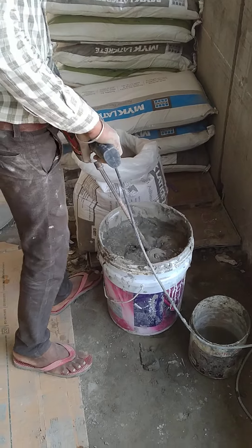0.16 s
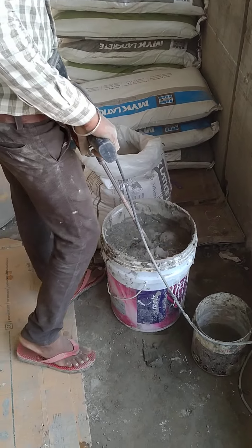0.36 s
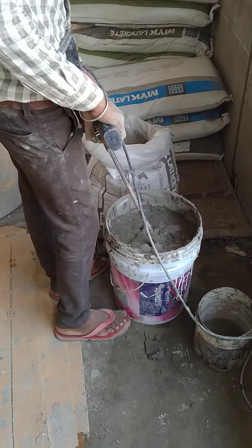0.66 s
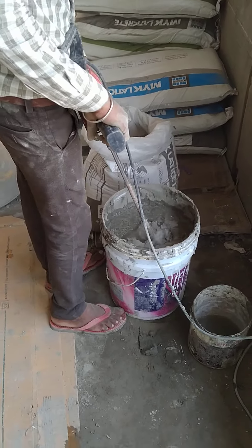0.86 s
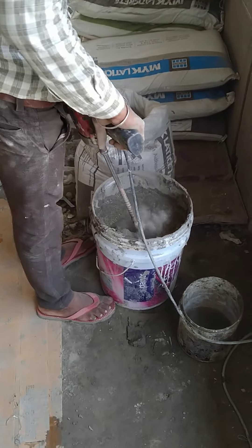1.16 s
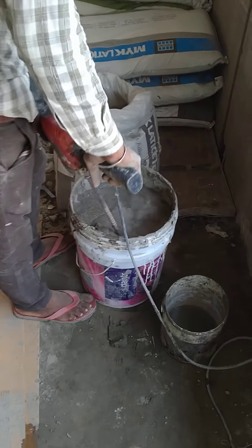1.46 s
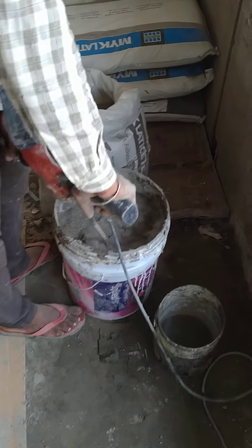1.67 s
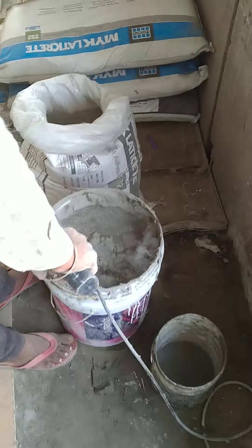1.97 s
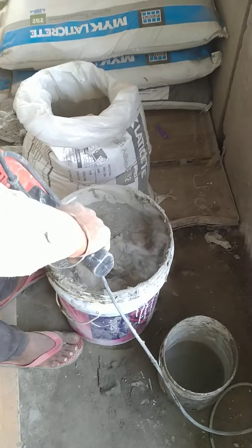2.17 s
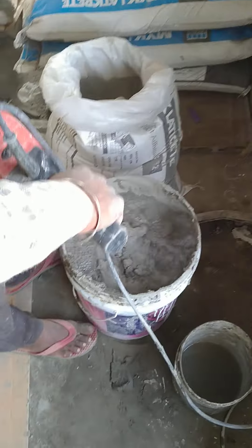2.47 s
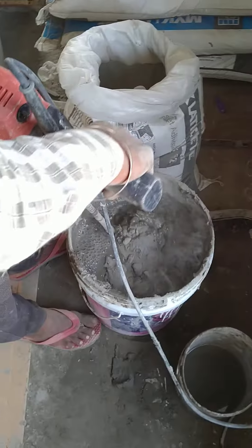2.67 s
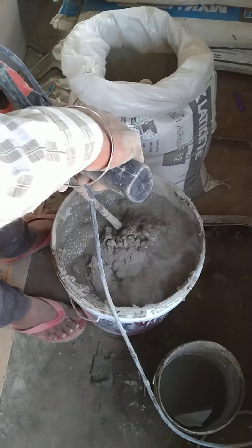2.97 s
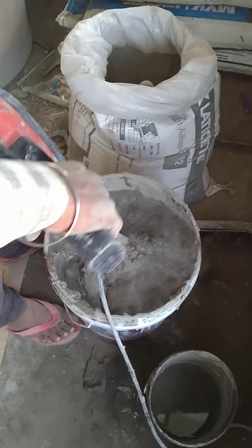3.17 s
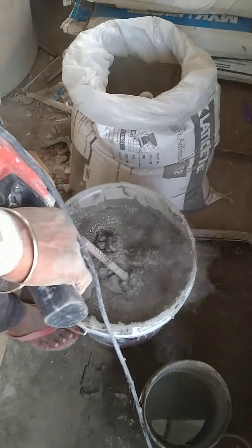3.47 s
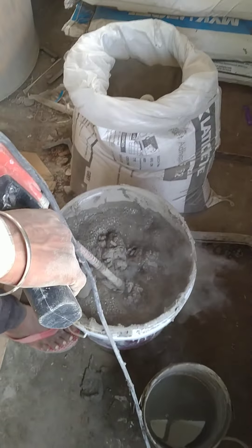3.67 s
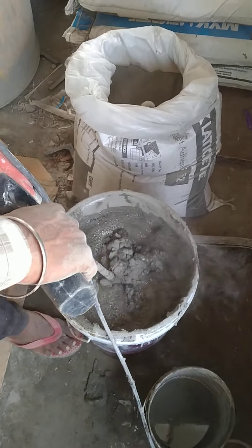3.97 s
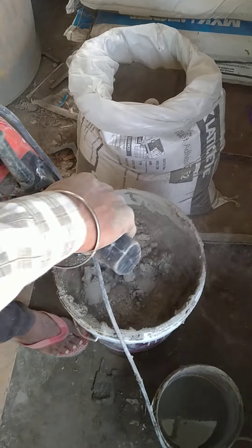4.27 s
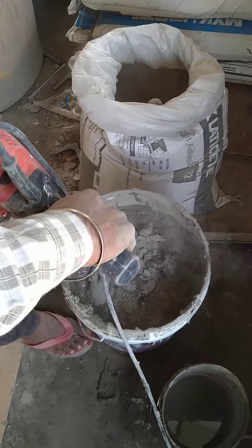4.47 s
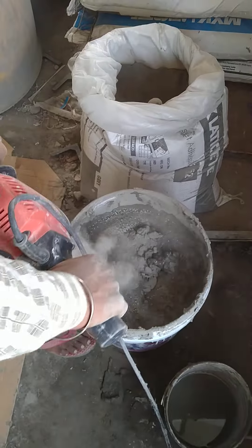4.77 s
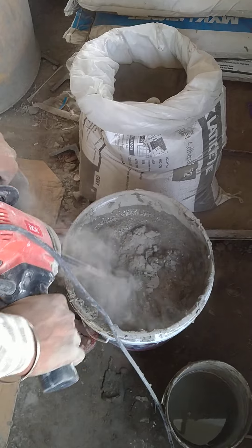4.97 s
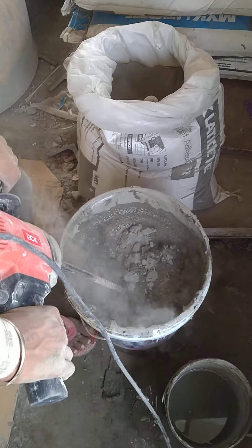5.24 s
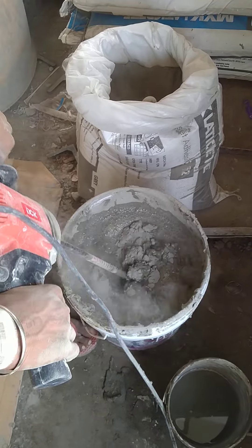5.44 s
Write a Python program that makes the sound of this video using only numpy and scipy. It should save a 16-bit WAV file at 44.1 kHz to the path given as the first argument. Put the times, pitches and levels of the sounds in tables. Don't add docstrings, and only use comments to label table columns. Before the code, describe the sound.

For about five and a half seconds an electric hand drill churns thick mortar in a plastic bucket, running from the first instant to an abrupt end. A loud, piercing gear whine near 2.8 kHz is joined by a higher tone near 4.8 kHz, both flickering with brief dropouts, over weaker buzzing gear tones. Pitch is steady at first, rises slightly around 1 s, sags to about 1.8 s while the whine grows strong, then climbs back by 3.4 s. It holds until 4 s, slides down to its lowest near 5.3 s, and starts recovering at the end. Under it is a constant broad roar: hissing brushes, vent air and hollow bucket churn, fuller from about 2.5 s as the phone looks into the bucket. The bare storeroom adds short, faint reflections. Mono, close phone sound, little deep bass, no extreme treble.

```python
import sys
import numpy as np
from scipy import signal
from scipy.fft import next_fast_len
from scipy.io import wavfile
from scipy.ndimage import uniform_filter1d

SR = 44100
rng = np.random.default_rng(int(sys.argv[2]) if len(sys.argv) > 2 else 0)


def elevation(decibels):
    levels = np.asarray(decibels, float)
    return 10 ** (levels / 20)


def store_pcm(level_fs):
    pcm = np.round(np.clip(level_fs, -1, 1) * 32767).astype(np.int16)
    wavfile.write(sys.argv[1], SR, np.atleast_2d(pcm).T)


N = 247401
TIME = np.arange(N) / SR

PINION_TEETH, ROTOR_SLOTS, WHEEL_TEETH, MAINS_HZ = 7, 12, 41, 50
END_RISE_HZ_PER_S, INERTIA_S = 17, 0.078
SPINDLE_REST_DB, OVERTONE_REST_DB = -49, -47.5
RUMBLE_DB, RUMBLE_GAIN_DB = -35, 2
SWELL_WIDTH_HZ = 210
BUCKET_HZ, BUCKET_DROP_HZ, BUCKET_WIDTH_HZ = 984, 130, 140
WALL_HZ, WALL_DROP_HZ, WALL_WIDTH_HZ = 872, 127, 35

# (time [s], turns [Hz])
ROTOR_SPEED = [(0, 406), (.35, 404.2), (.98, 413.2), (1.2, 404.8), (1.48, 379.7), (1.77, 363.4),
               (1.87, 363.3), (2.12, 383.8), (2.42, 383.2), (2.98, 395.9), (3.38, 403.4), (3.55, 399.5),
               (4.05, 402), (4.42, 380.2), (4.7, 376.7), (4.9, 362.7), (5.29, 352), (5.46, 376)]
# (time [s], level [dB])
MESH_LEVEL = [(.15, -27.5), (.5, -29.5), (.55, -32.5), (.85, -34.5), (1.35, -27.5), (1.5, -18),
              (1.8, -21.5), (2.0, -18.5), (2.3, -19.5), (2.65, -30.5), (2.8, -24), (3.65, -32),
              (4.085, -30), (4.105, -26), (4.35, -19.5), (5.07, -32.5), (5.19, -27.5), (5.34, -17.5)]
# (time [s], level [dB])
SLOT_LEVEL = [(0, -26.5), (.75, -29.5), (1.02, -21.5), (1.12, -29), (1.38, -24.5), (1.6, -25), (2.0, -30),
              (2.2, -23.5), (2.6, -24), (3.08, -18.5), (3.4, -23), (3.7, -35), (4.12, -23.5), (4.35, -30),
              (4.5, -21.5), (4.78, -22), (5.0, -33.5), (5.3, -23.5)]
# (time [s], length [s], depth [0-1])
SLOT_CANCELLATIONS = [(.125, .06, 0.9), (.33, .11, .95), (.527, .04, .8), (.673, .024, 0.9), (.6, .12, 0.2),
                      (.835, 0.042, .7), (.98, .06, .45), (1.17, 0.013, .7), (1.144, 0.013, 0.8),
                      (1.217, 0.016, 0.7), (1.32, .05, .9), (1.415, 0.013, .6), (1.375, .016, .7),
                      (1.478, 0.016, .9), (1.508, .025, .9), (1.764, 0.017, .8), (1.87, .05, 0.5),
                      (1.975, .03, .9), (2.11, 0.026, 0.7), (2.534, 0.012, 0.7), (2.77, .024, .6),
                      (2.834, 0.032, .7), (3.49, .04, .6), (3.9, .06, .5), (4.175, .012, 0.8),
                      (4.22, 0.01, .8), (5.04, .04, .6)]
# (time [s], length [s], depth [0-1])
MESH_CANCELLATIONS = [(.02, .14, .55), (.711, .018, .9), (1.19, 0.012, .9), (2.51, .05, 0.45),
                      (3.45, 0.22, 0.34), (3.87, 0.097, 0.42), (4.0, .16, .4), (4.55, 0.035, .5),
                      (4.768, 0.014, .95), (5.275, 0.11, 0.67), (1.77, .1, 0.22)]
# (time [s], spread [s], level [dB])
SPINDLE_BEAMS = [
    (.27, 0.27, -37),
    (.85, 0.33, -46),
    (1.68, 0.16, -41),
    (2.95, 0.27, -38.5),
    (3.75, 0.27, -37.5),
    (4.6, 0.28, -46),
    (5.07, .17, -33),
    (5.26, 0.073, -30.5),
    (5.55, .1, -41),
]
# (time [s], spread [s], level [dB])
OVERTONE_BEAMS = [(.15, 0.1, -42), (.8, .07, -34), (1.5, .2, -38.5), (1.82, .11, -26), (2.33, .07, -33),
                  (2.7, 0.08, -35.5), (3.15, 0.42, -36.5), (3.75, 0.2, -37.5), (4.4, 0.07, -33),
                  (4.9, 0.21, -36), (5.45, 0.15, -40.5)]
# (multiple of rotor speed, level over case noise [dB], facing time [s], spread [s])
ROTOR_ORDERS = [(1, -5.5, .65, .6), (1, -8, 1.95, .25), (1, -5, 3, .8), (1, -10, 4.4, .35), (2, -9, 3.6, 1),
                (4, -15, .7, .6), (8, -9, .5, .8), (8, -8, 3.6, .4), (8, -7, 4.5, .4), (8, -9, 5.5, .3),
                (13, -11, .1, .5), (13, -11, 2.9, .5), (15, -8, 3.7, .7), (16, -10, 1, .6),
                (16, -7, 3.9, .5)]
# (multiple of layshaft speed, level over case noise [dB],
# facing time [s], spread [s])
LAYSHAFT_ORDERS = [(14, -13, 3.9, .5), (20, -12, 1.1, .3), (21, -7, 1.25, .3), (21, -12, 3.6, .3),
                   (21, -12, 4.5, .3), (21, -9, 5.5, .3), (27, -10, 1.4, .3), (27, -11, 4.4, .7),
                   (35, -7, .5, .8), (35, -6, 2.9, .4), (35, -14, 5.3, .5), (48, -10, 1.6, .4),
                   (48, -10, 3.9, .8), (49, -10, .9, .5), (49, -10, 3.5, .5), (54, -12, .4, .4),
                   (54, -12, 3.4, .8), (55, -11, .8, .7), (55, -10, 3.1, .4), (56, -12, 1.2, .5),
                   (56, -10, 3.3, .8), (62, -10, 2.4, .5), (62, -11, 4.4, .4), (63, -10, 2.6, .4),
                   (63, -10, 4.4, .6)]
# (time [s], looks into bucket [0-1], gear case faces phone [0-1])
PHONE_POSE = [(0, 0.4, 0.2), (.25, .3, 0.28), (.85, .25, 0.23), (1.3, 0.11, .45), (1.7, 0.1, 0.4),
              (2.35, .6, 0.1), (2.62, .95, .45), (2.8, 0.8, 0.8), (3.05, 0.86, 0.4), (3.65, 1.02, 1.02),
              (4.05, .95, 0.9), (4.45, .85, .4), (5.15, 0.73, 1.02), (5.4, 0.4, .6), (5.61, 0.4, .1)]
# (level at rest [dB], gain looking into bucket [dB], gain facing case [dB])
NOISE_ZONES = [
    (-37.5, 7, 0.26),
    (-34.5, 2.2, 6.5),
    (-30, 1, 1.5),
    (-27.5, -1, -0.06),
]
ZONE_CENTRES_HZ = [860, 1680, 3780, 6130]
# (time [s], length [s], frequency [Hz], level [dB])
BAND_SWELLS = [(.6, 0.63, 1400, 2.5), (1.3, 1.3, 2717, 4), (1.395, 0.86, 3060, -4), (2.6, 0.44, 4310, 4),
               (3.49, 1.5, 2210, -5.5), (3, 1.1, 5150, 5), (3.65, .6, 1450, 3.5), (1.45, 0.38, 5450, 3),
               (1.5, .35, 700, -1.5), (5.05, 0.33, 1900, 1), (4, .8, 2800, 4.5), (4.2, 0.43, 4700, 1),
               (5.3, .25, 3350, 5), (3.7, 0.6, 5900, 5), (0.58, 0.98, 1150, -3), (3.4, 0.29, 3950, 2.5),
               (3.1, 0.34, 3100, -5.5), (3.6, .35, 5200, -5), (6.2, .3, 6400, -5)]
# (frequency [Hz], level [dB per Hz])
MIC_COLOUR = [(40, -55.5), (100, -30.5), (200, -12), (400, -6.5), (560, -4.5), (680, -1), (1000, -1),
              (1500, -1), (2300, 1), (3200, 0.5), (4500, 2.5), (5700, 6), (6500, -1.5), (7000, -16.5),
              (7500, -29.5)]


def whine():
    ripple_turns = .0027 * np.sin(4 * np.pi * MAINS_HZ * TIME)
    turns = np.cumsum(rotor_hz()) / SR + ripple_turns
    layshaft_rad = 2 * np.pi * turns * PINION_TEETH / WHEEL_TEETH
    run_out = 1 + (.19 + .08 * drift(6)) * np.exp(1j * layshaft_rad) - .09 * np.exp(-1j * layshaft_rad)

    mesh = np.exp(2j * np.pi * PINION_TEETH * turns) * (run_out + 0.14 * drift(49))
    mesh *= cancellation(MESH_CANCELLATIONS)
    slots = np.exp(2j * np.pi * ROTOR_SLOTS * turns) * (1 + 0.18 * drift(33))
    slots *= cancellation(SLOT_CANCELLATIONS)
    spindle = np.exp(4j * PINION_TEETH * layshaft_rad) * (1.02 + .2 * drift(15))
    overtone = np.exp(4j * np.pi * PINION_TEETH * turns) * (0.89 + .4 * drift(28))

    out = elevation(along(MESH_LEVEL, 1)) * mesh.real
    out += elevation(along(SLOT_LEVEL, 1)) * slots.real
    out += beam(SPINDLE_BEAMS, SPINDLE_REST_DB) * spindle.real
    out += beam(OVERTONE_BEAMS, OVERTONE_REST_DB) * overtone.real
    return np.sqrt(2) * out


def gears():
    speed_hz = rotor_hz()
    turns = np.cumsum(speed_hz) / SR
    coarse_s, coarse_hz = TIME[::200], speed_hz[::200]
    wander = .2 * drift(2) + .5 * drift(14)
    out = np.zeros(N)
    for ratio, table in ((1, ROTOR_ORDERS), (PINION_TEETH / WHEEL_TEETH, LAYSHAFT_ORDERS)):
        for order, db, s, spread_s in table:
            multiple = order * ratio
            facing = 0.12 + np.exp(-((coarse_s - s) / spread_s) ** 2)
            case_db = field_db(coarse_s, multiple * coarse_hz)
            level = np.interp(TIME, coarse_s, facing * elevation(db + case_db))
            fade = 1 + min(multiple / 3, 1) * np.roll(wander, rng.integers(N))
            tone = np.exp(2j * np.pi * (multiple * turns + rng.random()))
            out += level * (fade * tone).real
    return elevation(-.5) * out


def roar():
    size, hop = 1024, 256
    frames, hz = N // hop + 5, np.fft.rfftfreq(size, 1 / SR)
    t = np.arange(frames) * hop / SR
    a, b, patches, flicker = rng.standard_normal((frames, len(hz), 4)).T
    patches = smoothed(patches, 6, 60)
    flicker = smoothed(flicker, 30, 5)
    grid_hz = hz[:, None] * np.ones(frames)
    level_db = field_db(t, grid_hz) + .9 * patches + 0.43 * flicker
    z = (a + 1j * b) * bucket(t, grid_hz) * elevation(level_db)
    air = signal.istft(z, nperseg=size, noverlap=size - hop)[1][:N]
    rotor_rad = 2 * np.pi * np.cumsum(rotor_hz()) / SR
    brushes = 1 + .04 * np.cos(rotor_rad) + .07 * np.cos(rotor_rad * PINION_TEETH / WHEEL_TEETH)
    return elevation(-14.5) * air * brushes


def bucket(t, hz):
    rim = along(PHONE_POSE, 1, t)
    column_hz = BUCKET_HZ - BUCKET_DROP_HZ * rim
    wall_hz = WALL_HZ - WALL_DROP_HZ * rim ** 2
    column = (0.43 + .5 * rim) * np.exp(-((hz - column_hz) / BUCKET_WIDTH_HZ) ** 2)
    wall = (0.6 + .3 * rim) * np.exp(-((hz - wall_hz) / WALL_WIDTH_HZ) ** 2)
    return 1 + column + wall


def storeroom(x):
    t60_s = .4
    at = np.arange(120, SR // 2, 22)
    at = at + rng.integers(0, 22, len(at))
    taps = np.zeros(SR // 2 + 22)
    taps[at] = rng.choice([-1., 1.], len(at)) * elevation(-60 * at / SR / t60_s)
    return signal.fftconvolve(x, taps / np.linalg.norm(taps))[:N]


def rotor_hz():
    late_s = np.maximum(TIME - ROTOR_SPEED[-1][0], 0)
    speed_hz = along(ROTOR_SPEED, 1) + END_RISE_HZ_PER_S * late_s
    return uniform_filter1d(speed_hz, size=round(INERTIA_S * SR), mode="nearest")


def cancellation(table):
    gain = np.ones(N)
    for s, length_s, depth in table:
        gain *= 1 - np.clip(depth, 0, 1) / (1 + ((TIME - s) / (length_s / 2)) ** 6)
    return gain


def beam(table, rest_db):
    return elevation(rest_db) + sum(elevation(db) * np.exp(-((TIME - s) / spread_s) ** 2) for s, spread_s, db in table)


def field_db(t, hz):
    rim, case = along(PHONE_POSE, 1, t), along(PHONE_POSE, 2, t)
    zones = np.array([rest + above * rim + facing * case for rest, above, facing in NOISE_ZONES])
    place = np.interp(np.log(hz + 1), np.log(ZONE_CENTRES_HZ), np.arange(len(zones)))
    low = np.minimum(place.astype(int), len(zones) - 2)
    blend = place - low
    steps = np.arange(len(t))
    level = (1 - blend) * zones[low, steps] + blend * zones[low + 1, steps]
    level -= 10 * np.log10(np.interp(hz, ZONE_CENTRES_HZ, [0.66, 0.97, 1.35, 2.43]))
    far = 1 / (1 + (hz / 450) ** 6)
    level = far * (RUMBLE_DB + RUMBLE_GAIN_DB * rim) + (1 - far) * level
    for s, length_s, centre_hz, db in BAND_SWELLS:
        level += db * np.exp(-((t - s) / length_s) ** 2 - ((hz - centre_hz) / SWELL_WIDTH_HZ) ** 2)
    colour_hz, colour_db = np.transpose(MIC_COLOUR)
    return level + np.interp(np.log(hz + 1), np.log(colour_hz), colour_db)


def drift(hz):
    f = np.fft.fftfreq(next_fast_len(N), 1 / SR)
    a, b = rng.standard_normal((len(f), 2)).T
    return evened(np.fft.ifft((a + 1j * b) / (1 + (f / hz) ** 2))[:N])


def smoothed(x, bins, frames):
    return evened(uniform_filter1d(uniform_filter1d(x, size=bins, axis=0), size=frames, axis=1))


def evened(x):
    return x / np.sqrt(np.mean(abs(x) ** 2) + 1e-20)


def along(table, column, t=TIME):
    rows = np.array(table)
    return np.interp(t, rows[:, 0], rows[:, column])


def scene():
    tones = whine() + gears()
    mono = tones + elevation(-11.5) * storeroom(tones) + roar()
    return np.array([mono, mono])


def top_cut(x):
    return signal.sosfilt(signal.butter(12, 7650, fs=SR, output="sos"), x)


def record(dry):
    bass_cut = signal.butter(4, 85, "high", fs=SR, output="sos")
    thin = signal.sosfilt(bass_cut, dry)
    return top_cut(thin)


dry = scene()
out = record(dry)
store_pcm(out)
```